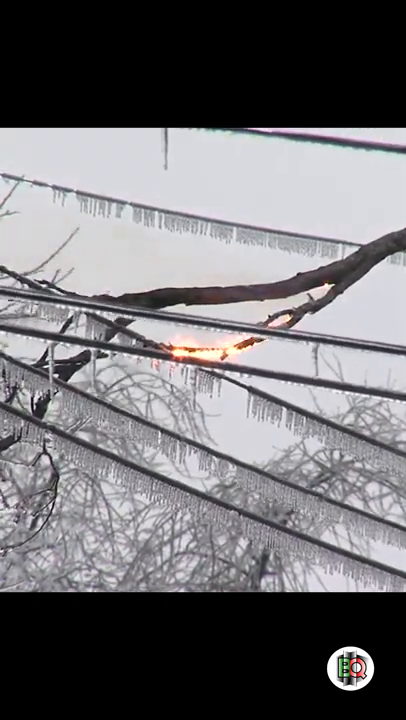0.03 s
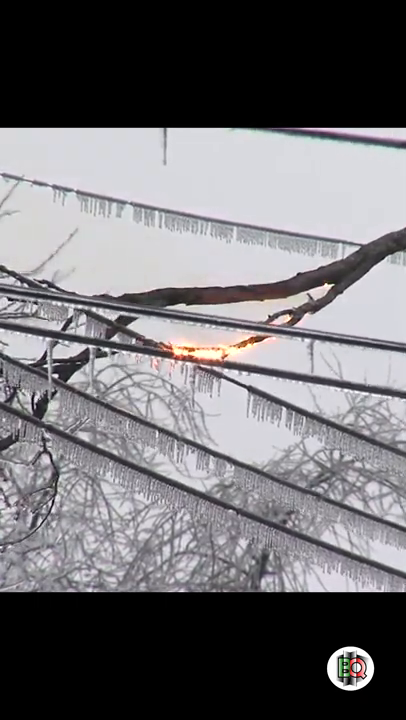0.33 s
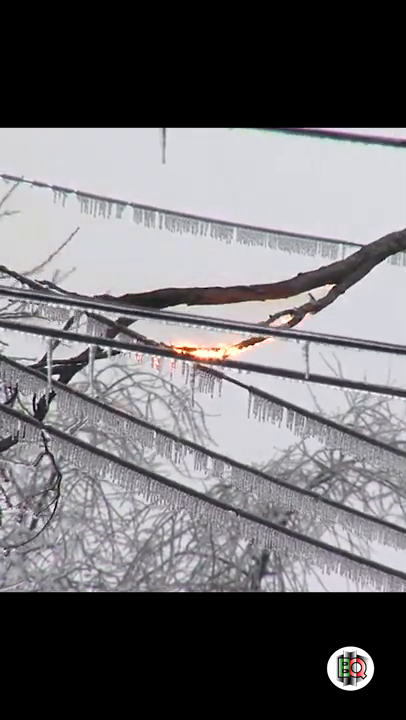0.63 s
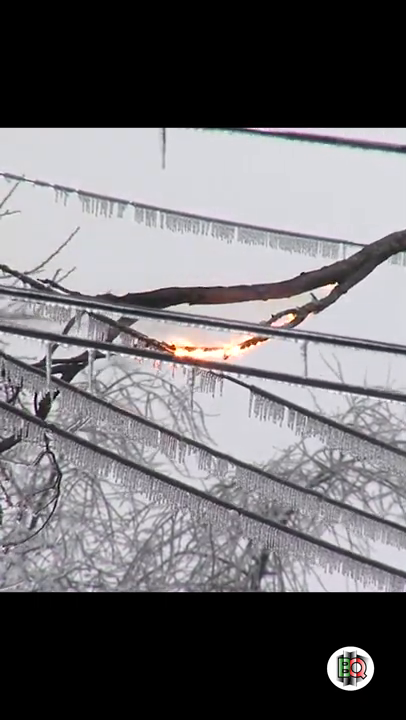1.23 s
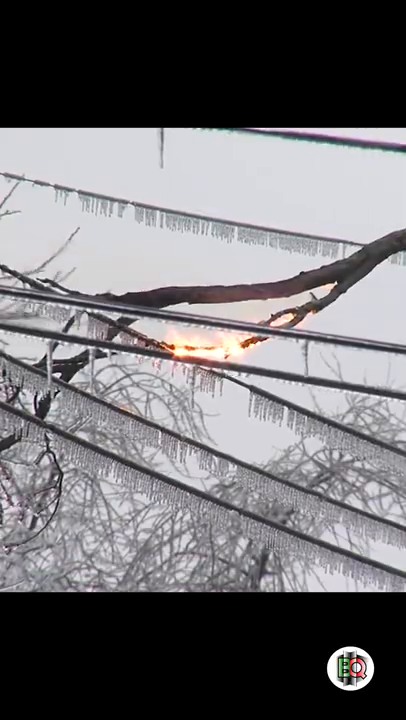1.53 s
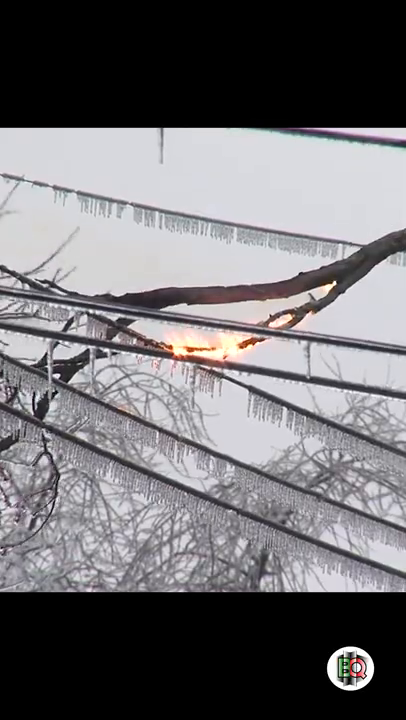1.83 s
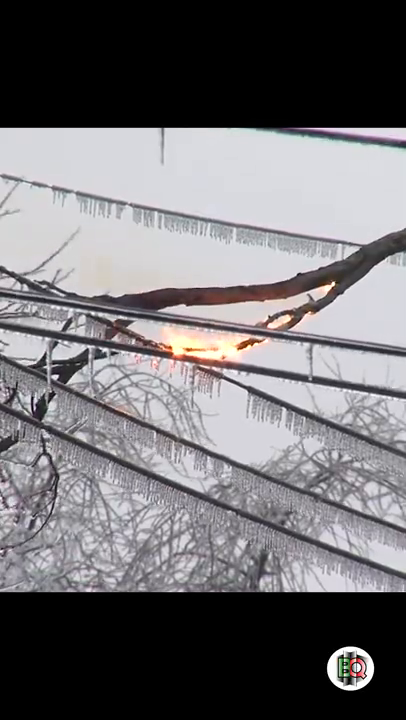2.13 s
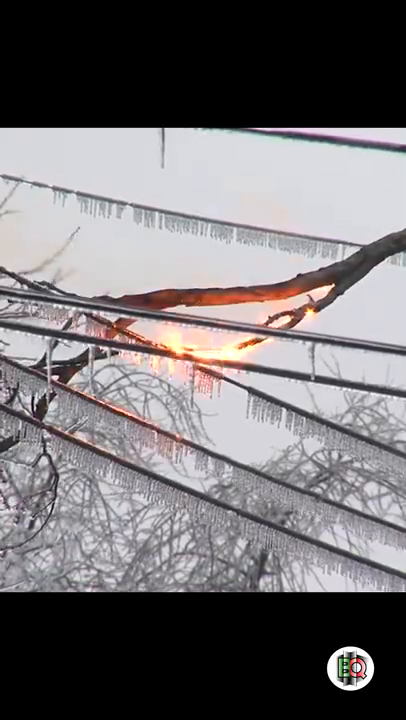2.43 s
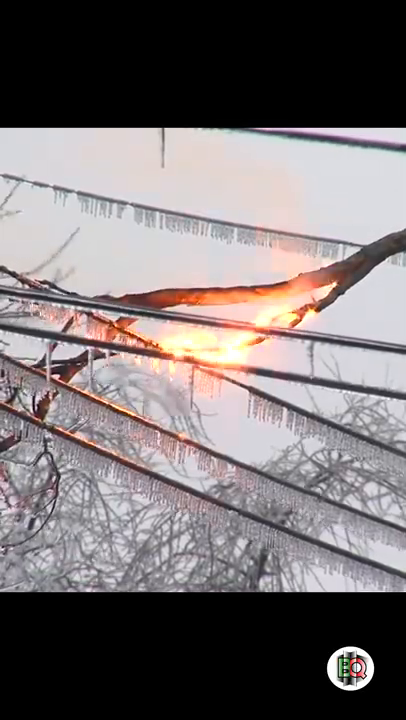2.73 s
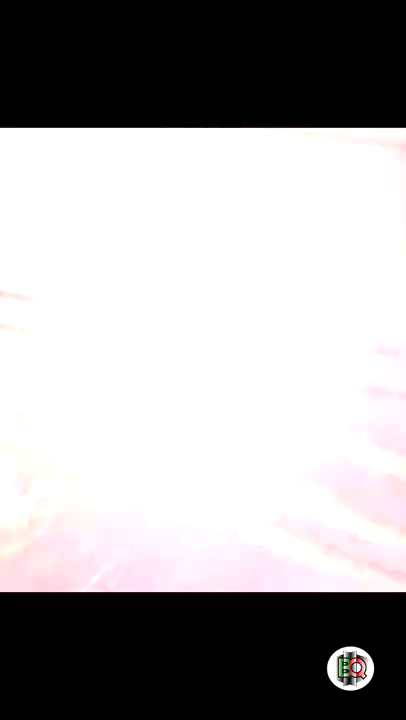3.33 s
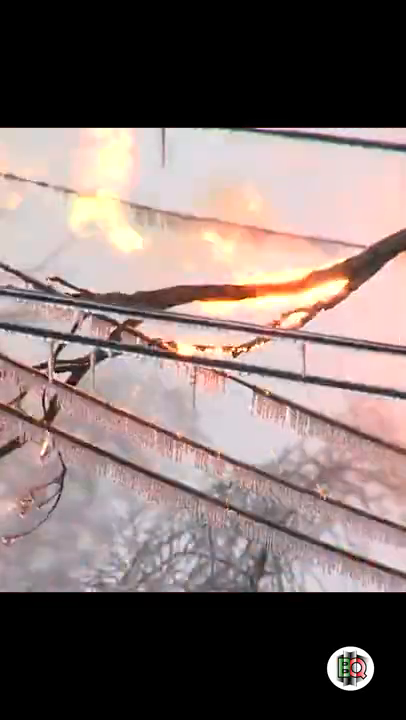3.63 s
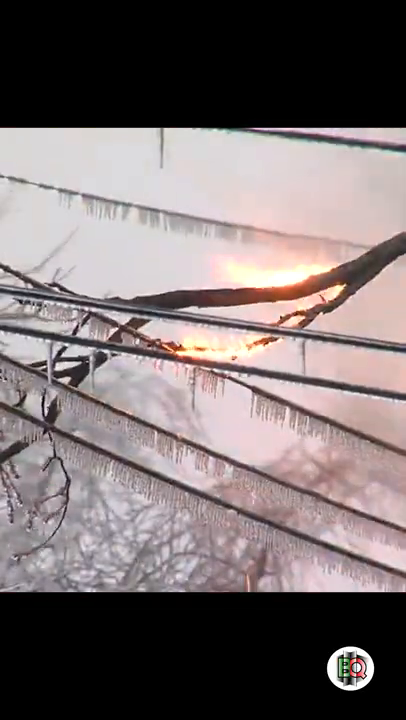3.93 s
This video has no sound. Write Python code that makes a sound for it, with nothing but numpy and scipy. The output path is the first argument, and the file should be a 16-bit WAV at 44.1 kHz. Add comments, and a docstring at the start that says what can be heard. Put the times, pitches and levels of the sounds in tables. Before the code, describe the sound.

An electrical arc on a power line hisses, swells into a loud crackling buzz and cuts out with a thump, echoing down the street. Before and beneath it, a diesel engine idles close to the microphone.

```python
"""A six-cylinder diesel, probably a truck, idles near the microphone, knocking over its own rumble.
About three seconds in, an arc hisses on an iced power line in the street. Relighting on each half-cycle
of the mains, it swells into a crackling buzz that overloads the microphone, then goes out with a thump.
Houses and trees ring on with its echo. Only the right channel carries sound."""
import sys
import numpy as np
from scipy import signal
from scipy.fft import rfft, irfft
from scipy.io import wavfile

SR = 44100
rng = np.random.default_rng(int(sys.argv[2]) if len(sys.argv) > 2 else 0)


def wav_out(sig):
    """Save sig, one row per channel (or a flat mono array), as 16-bit PCM at SR to the path in sys.argv[1]."""
    wavfile.write(sys.argv[1], SR, np.round(np.clip(np.atleast_2d(sig).T, -1, 1) * 32767).astype(np.int16))


N = 176400
T = np.arange(N) / SR
FREQS = np.maximum(np.arange(N // 2 + 1) * SR / N, 1)

# Rumble and fan wash of the nearby engine: frequency_hz, relative_db
RUMBLE_SPECTRUM = [(18, -54), (30, -31), (69, -18), (90, -13), (123, -10), (150, -9), (230, -5),
                   (315, -4.5), (450, -8), (620, -7.5), (850, -10), (1200, -14), (1600, -13.5), (1850, -17),
                   (2700, -21), (3800, -26.5), (4500, -28), (5500, -35.5), (6500, -43), (7600, -39),
                   (9800, -46.5), (12000, -52.5), (13000, -59), (15500, -61)]
# Slight swells of that wash: time_s, gain_db
RUMBLE_SWELL = [(0, 0.5), (.3, 0.2), (.55, 0), (.75, 1.2), (1.0, -0.75), (1.3, 1), (1.6, 0.2), (2.1, 0),
                (2.7, 0), (3.1, 0.5), (4, 1.5)]
# Ringing engine parts: pitch_hz, width_hz, level_db
RINGING_PARTS = [(167, 57, -42.5), (1304, 46, -45), (1974, 38, -51), (2099, 19, -50.5)]
# Steady engine tones: pitch_hz, level_db
IDLE_TONES = [(50, -66), (105, -49), (140, -44), (154.5, -44.5), (175, -49)]
FIRING_HZ, FIRST_FIRING_S = 34.98, -0.0056
RUMBLE_DB, REPEATING_SHARE, THROB_DB = -31.5, 0.21, 0.5

# Knock of each cylinder, in firing order: relative_db
CYLINDER_KNOCK_DB = [0, 3, 1.5, -33, 5, -10]
# Colour of the knocks: frequency_hz, relative_db
KNOCK_SPECTRUM = [(500, -34.5), (1500, 0), (2700, 7), (3500, -2.5), (4300, 0.5), (5000, -25), (6300, -28),
                  (12000, -45)]
KNOCK_DB, KNOCK_RISE_S, KNOCK_DECAY_S, KNOCK_SCATTER_DB = -42.5, 0.0011, 0.01, 2.5
TICK_DB, TICK_HZ, TICK_WIDTH_HZ, TICK_DELAY_S, TICK_DECAY_S = -60, 7700, 950, 0.013, 0.0035
# Sharp snaps in the clatter: start_s, level_db, pitch_hz
ENGINE_SNAPS = [(.1974, -45, 3700), (.2838, -38, 3600), (0.798, -34, 3860), (1.0565, -35, 2700),
                (1.2266, -34.5, 3120), (1.397, -30, 1990), (1.399, -36, 3780), (2.17, -32.5, 2930),
                (2.683, -33.5, 3050), (3.371, -36.5, 3600)]
SNAP_WIDTH_HZ, SNAP_RISE_S, SNAP_DECAY_S = 860, 0.0004, 0.0062

# Strength of the arc on the line: time_s, roar_db, sizzle_db
ARC_LEVELS = [(2.9, -62, -77), (3.2, -50, -47), (3.36, -38, -45.5), (3.42, -37, -70), (3.46, -30.5, -38.5),
              (3.508, -23, -43), (3.545, -15, -25.5), (3.6, -8, -17.5), (3.63, -14.5, -23.5),
              (3.66, -21, -26.5), (3.69, -19, -21), (3.715, -18.5, -26.5), (3.76, -21.5, -23.5),
              (3.81, -22, -28)]
# Colour of its roar: frequency_hz, relative_db
ROAR_SPECTRUM = [(30, -28), (80, -43), (200, -3.5), (290, 3), (430, -3), (540, 1), (640, -9), (840, 2),
                 (1030, -7.5), (1200, -7), (1450, -9.5), (2000, -8.5), (3000, -17), (6000, -33),
                 (15000, -77)]
# Colour of its sizzle: frequency_hz, relative_db
SIZZLE_SPECTRUM = [(1000, -11), (2500, -5.5), (3500, 2.5), (4700, -3), (5500, -8.5), (8200, -14),
                   (9500, -23.5), (11200, -29.5), (12000, -22.5), (13000, -35), (15500, -36)]
BUZZ_HZ = 119.67  # twice the mains frequency
ROAR_PULSE_DB, SIZZLE_PULSE_DB, ROAR_FLICKER_DB = -1.5, 2, 1.5
SPARKS_PER_S, SPARK_SPREAD_DB, SPARK_SHARE = 4000, 2, 0.56
ARC_OUT_S, ARC_RELEASE_S = 3.816, 0.0019
# Spits of sparks: start_s, level_db
SPARK_SPITS = [(3.479, -37), (3.515, -34), (3.522, -30), (3.539, -31), (3.564, -30), (3.599, -17.5),
               (3.688, -20), (3.812, -25)]
SPIT_RISE_S, SPIT_DECAY_S = 0.00044, 0.004
STEAM_PEAK_S, STEAM_SPREAD_S, STEAM_HZ, STEAM_WIDTH_HZ, STEAM_DB = 3.25, 0.1, 1665, 180, -36

# Mains hum of the arc: time_s, fundamental_db, overtones_db
HUM_LEVELS = [(3.2, -50, -64), (3.37, -43, -34), (3.41, -33, -37), (3.47, -28, -34), (3.505, -35, -30),
              (3.524, -26, -15), (3.565, -26, -20.5), (3.6, -19, -10.5), (3.67, -28, -21),
              (3.755, -26.5, -18.5), (3.8, -38, -35)]
# Its overtones, and their fade once the arc stretches: multiple, relative_db, fade_db_per_s
HUM_OVERTONES = [(2, -2, -4), (3, -2.5, 51), (4, -13.5, 32), (6, -21.5, 35), (7, -17, 25), (10, -19, 30)]
STRETCH_START_S, HUM_WAVER_DB, HUM_WANDER_RAD = 3.62, 2.2, 0.4

# Thumps as the arc flares and goes out: start_s, level_db, pitch_hz
ARC_THUMPS = [(3.478, -13, 270), (3.5147, -16, 327), (3.5213, -6, 320), (3.8128, -7, 480),
              (3.814, -3.5, 297)]
THUMP_RISE_S, THUMP_LOW_CUT_HZ = 0.0015, 64

# Echo of the street at the microphone: frequency_hz, level_db, t60_s
STREET_ECHO = [(100, -4.5, 6.4), (250, -11.5, 1.8), (400, -16, 1.8), (700, -12.5, 1.9), (2000, -6.5, 2.3),
               (4470, -10, 2.4), (8000, -5, 0.66), (14000, -14, .35)]
ECHO_DELAY_S = 0.04
MIC_GAIN_DB, MIC_CLIP_LEVEL, MIC_CUTOFF_HZ = 5.5, 0.93, 15500


def from_db(db):
    """Decibels to gain."""
    return 10 ** (np.asarray(db) / 20)


def unit_power(x):
    """Scale to unit power."""
    return x / np.sqrt(np.mean(x ** 2) + 1e-20)


def white():
    """White noise."""
    return rng.standard_normal(N)


def gain_curves(rows):
    """One gain curve per level column of (time_s, level_db, ...), silent before the first row."""
    times, *columns = np.transpose(rows)
    return [from_db(np.interp(T, times, levels)) * (T >= times[0]) for levels in columns]


def at_hz(rows, hz):
    """Read the columns of a table on a log-frequency axis."""
    freqs, *columns = np.transpose(rows)
    return [np.interp(np.log(hz), np.log(freqs), column) for column in columns]


def colour(x, spectrum):
    """Filter a steady signal by a spectrum; unit power."""
    return unit_power(irfft(rfft(x) * from_db(at_hz(spectrum, FREQS)[0]), N))


def drift(rate_hz):
    """Random wander, mostly slower than rate_hz; unit power."""
    return unit_power(irfft(rfft(white()) / (1 + (FREQS / rate_hz) ** 2), N))


def ringing_noise(hz, width_hz):
    """Noise passed twice through one resonance for steep skirts; unit power."""
    radius = np.exp(-np.pi * width_hz * np.sqrt(2) / SR)
    b, a = [1, 0.0042, -0.999], [1, -2 * radius * np.cos(2 * np.pi * hz / SR), radius * radius]
    return unit_power(signal.lfilter(b, a, signal.lfilter(b, a, white())))


def blend(a, b, share):
    """Mix two unrelated signals; b has this share of the power."""
    return np.sqrt(1 - share) * a + np.sqrt(share) * b


def blows(times, levels_db, rise_s, decay_s):
    """Envelope of a series of blows that rise fast and die away."""
    hits = np.zeros(N)
    inside = (times >= 0) & (times < T[-1])
    np.add.at(hits, (times[inside] * SR).astype(int), from_db(levels_db)[inside])
    up, down = np.exp(-1 / (rise_s * SR)), np.exp(-1 / (decay_s * SR))
    decays = signal.lfilter([1], [1, -down], hits + 1e-18)
    return signal.lfilter([1 - up], [1, -up], decays)


def engine_rumble():
    """The nearby diesel: a wash that partly repeats every six firings, ringing parts and steady tones."""
    cycle = rng.standard_normal(round(len(CYLINDER_KNOCK_DB) * SR / FIRING_HZ))
    drive = blend(white(), np.resize(cycle, N), REPEATING_SHARE)
    throb = from_db(THROB_DB * np.cos(2 * np.pi * FIRING_HZ * T))
    wash = from_db(RUMBLE_DB) * gain_curves(RUMBLE_SWELL)[0] * colour(drive * throb, RUMBLE_SPECTRUM)
    rings = sum(from_db(db) * ringing_noise(hz, width) for hz, width, db in RINGING_PARTS)
    tones = np.zeros(N)
    for hz, db in IDLE_TONES:
        phase = 2 * np.pi * (hz * T + rng.random()) + 0.34 * drift(0.98)
        tones += from_db(db) * np.sqrt(2) * np.sin(phase)
    return wash + rings + tones


def engine_clatter():
    """Each firing gives one knock, at its cylinder's own strength, and two faint high ticks."""
    firings = FIRST_FIRING_S + np.arange(int(T[-1] * FIRING_HZ) + 1) / FIRING_HZ
    scatter_db = KNOCK_SCATTER_DB * rng.standard_normal(len(firings))
    levels_db = KNOCK_DB + np.resize(CYLINDER_KNOCK_DB, len(firings)) + scatter_db
    knocks = blows(firings, levels_db, KNOCK_RISE_S, KNOCK_DECAY_S)
    tick_times = np.concatenate([firings, firings + 0.5 / FIRING_HZ]) + TICK_DELAY_S
    ticks = blows(tick_times, np.full(len(tick_times), TICK_DB), KNOCK_RISE_S, TICK_DECAY_S)
    return knocks * colour(white(), KNOCK_SPECTRUM) + ticks * ringing_noise(TICK_HZ, TICK_WIDTH_HZ)


def engine_snaps():
    """Single snaps stand out of the clatter, each ringing at its own pitch, coloured like the knocks."""
    snaps = np.zeros(N)
    for start_s, db, hz in ENGINE_SNAPS:
        envelope = blows(np.array([start_s]), [db], SNAP_RISE_S, SNAP_DECAY_S)
        snaps += envelope * colour(ringing_noise(hz, SNAP_WIDTH_HZ), KNOCK_SPECTRUM)
    return snaps


def arc_crackle():
    """Up on the line, a turbulent roar and dense sparks both pulse with the mains."""
    roar_gain, sizzle_gain = gain_curves(ARC_LEVELS)
    pulse = np.cos(2 * np.pi * BUZZ_HZ * T)
    sparks = (rng.random(N) < SPARKS_PER_S / SR) * rng.choice([-1, 1], N)
    spark_sizes = from_db(SPARK_SPREAD_DB * np.minimum(rng.exponential(1, N), 4))
    turbulence = white() * from_db(ROAR_PULSE_DB * pulse + ROAR_FLICKER_DB * drift(50))
    roar = colour(turbulence, ROAR_SPECTRUM)
    crackle = blend(white(), unit_power(sparks * spark_sizes), SPARK_SHARE)
    sizzle = colour(crackle * from_db(SIZZLE_PULSE_DB * pulse), SIZZLE_SPECTRUM)
    spits = blows(*np.transpose(SPARK_SPITS), SPIT_RISE_S, SPIT_DECAY_S)
    return roar_gain * roar + (sizzle_gain + spits) * sizzle


def steam_hiss():
    """A short, narrow hiss before the flash, probably steam from a wet branch."""
    swell = np.exp(-((T - STEAM_PEAK_S) / STEAM_SPREAD_S) ** 2)
    return from_db(STEAM_DB) * swell * ringing_noise(STEAM_HZ, STEAM_WIDTH_HZ)


def hum_partial(multiple):
    """One multiple of the buzz, wavering in phase and level."""
    phase = 2 * np.pi * (multiple * BUZZ_HZ * T + rng.random()) + HUM_WANDER_RAD * drift(14)
    return np.sqrt(2) * np.sin(phase) * from_db(HUM_WAVER_DB * drift(22))


def arc_hum():
    """The hot channel swells on each half-cycle of the mains; its buzz mellows as it stretches."""
    fundamental_gain, overtone_gain = gain_curves(HUM_LEVELS)
    stretched_s = np.maximum(T - STRETCH_START_S, 0)
    fundamental = hum_partial(1)
    overtones = sum(from_db(db - fade * stretched_s) * hum_partial(multiple)
                    for multiple, db, fade in HUM_OVERTONES)
    return fundamental_gain * fundamental + overtone_gain * overtones


def arc_thumps():
    """Sudden expansions and the final collapse: low pressure swings of about two cycles."""
    pressure = np.zeros(N)
    for start_s, db, hz in ARC_THUMPS:
        age = np.maximum(T - start_s, 0)
        envelope = age / THUMP_RISE_S * np.exp(1 - age / THUMP_RISE_S)
        pressure += from_db(db) * envelope * np.sin(2 * np.pi * hz * age)
    return signal.sosfilt(signal.butter(1, THUMP_LOW_CUT_HZ, "high", fs=SR, output="sos"), pressure)


def street_echo(source):
    """Houses and trees scatter the sound back to the microphone; the high treble dies first."""
    edges_hz = np.geomspace(50, 16000, 13)
    age = np.maximum(T - ECHO_DELAY_S, 0)
    response = np.zeros(N)
    for low, high in zip(edges_hz, edges_hz[1:]):
        db, t60_s = at_hz(STREET_ECHO, np.sqrt(low * high))
        decay = from_db(-60 * age / t60_s) * (age > 0)
        band = signal.sosfilt(signal.butter(3, [low, high], "band", fs=SR, output="sos"), white())
        response += from_db(db) * band * decay / np.linalg.norm(decay)
    return signal.fftconvolve(source, response)[:N]


def scene():
    """From the street: the engine near and dry, the arc with its echo, all on the right channel."""
    engine = engine_rumble() + engine_clatter() + engine_snaps()
    burning = np.exp(-np.maximum(T - ARC_OUT_S, 0) / ARC_RELEASE_S)
    arc = burning * (arc_crackle() + arc_hum()) + steam_hiss() + arc_thumps()
    return np.stack([np.zeros(N), engine + arc + street_echo(arc)])


def record(dry):
    """The microphone overloads on the flash; the top of the treble is cut steeply."""
    clipped = np.clip(from_db(MIC_GAIN_DB) * dry, -MIC_CLIP_LEVEL, MIC_CLIP_LEVEL)
    return signal.sosfilt(signal.ellip(10, 0.1, 70, MIC_CUTOFF_HZ, fs=SR, output="sos"), clipped)


dry = scene()
out = record(dry)
wav_out(out)
```